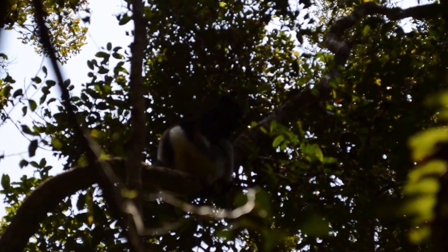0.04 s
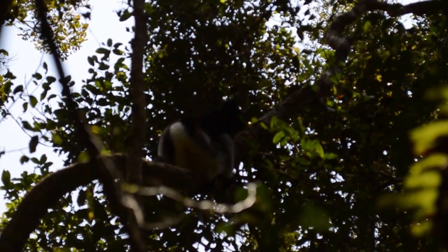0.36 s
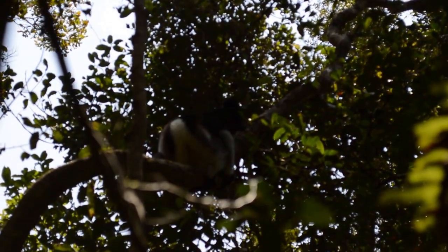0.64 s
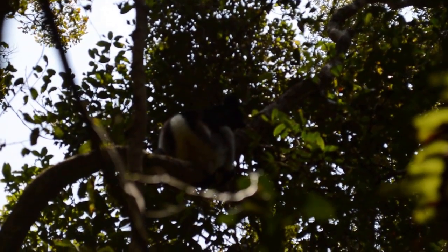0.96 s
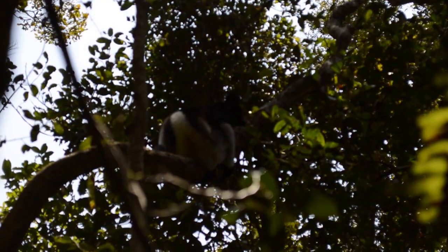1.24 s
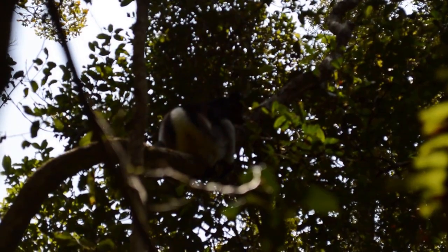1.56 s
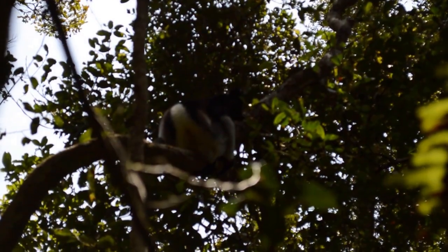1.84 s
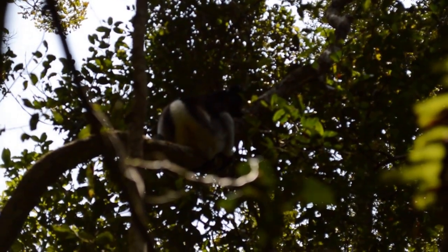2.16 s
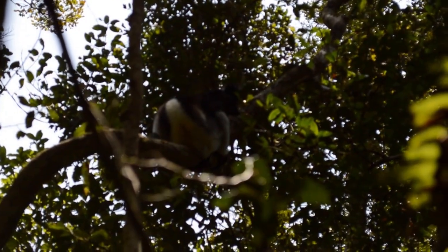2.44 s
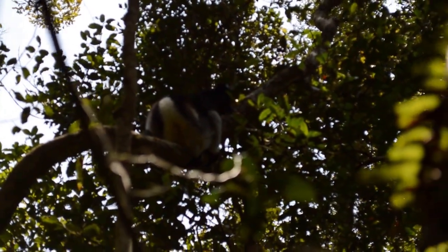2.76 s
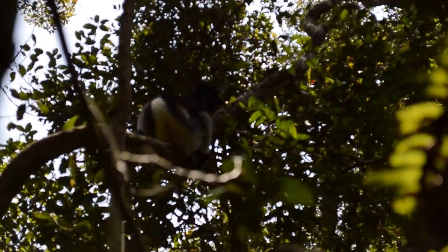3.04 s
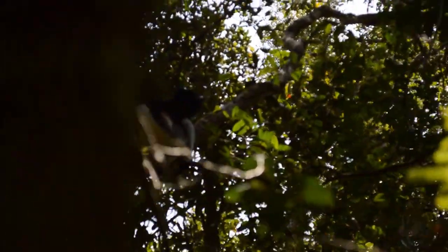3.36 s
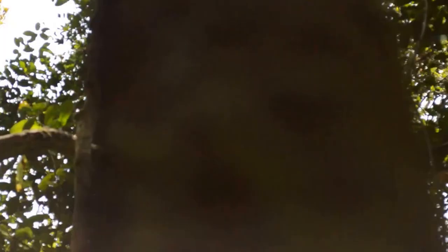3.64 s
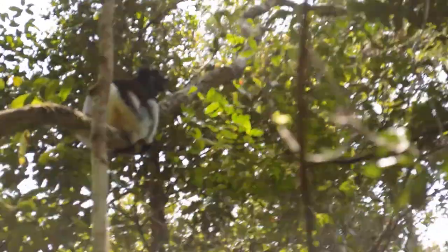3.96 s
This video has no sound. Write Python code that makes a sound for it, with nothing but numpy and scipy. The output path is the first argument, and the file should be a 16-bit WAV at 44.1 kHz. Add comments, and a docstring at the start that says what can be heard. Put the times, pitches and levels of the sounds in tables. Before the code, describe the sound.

A lemur's wailing call, heard on one microphone among trees. After a fading echo and a quiet stretch of twig ticks and hiss, the wail rises over rustling leaves and jumps to a loud, brassy, distorted note.

```python
"""An indri singing in a rainforest, on one microphone among the trees. The echo of a wail dies away over
soft hiss, low rumble and a faint hum. Twigs tick, a far insect swells three times, a distant whistle falls.
At 2.4 s a new wail starts, sags and climbs as the mouth opens, while leaves rustle. It roughens and at
3.7 s breaks into a much louder high note that overloads the recorder and pulls its gain down."""
import sys
import numpy as np
from scipy import signal
from scipy.fft import rfft, irfft
from scipy.io import wavfile
from scipy.ndimage import uniform_filter1d

SR = 44100
rng = np.random.default_rng(int(sys.argv[2]) if len(sys.argv) > 2 else 0)


def wav_out(sig):
    """Save sig, one row per channel (or a flat mono array), as 16-bit PCM at SR to the path in sys.argv[1]."""
    wavfile.write(sys.argv[1], SR, np.round(np.clip(np.atleast_2d(sig).T, -1, 1) * 32767).astype(np.int16))


N = 176400
LEAD = SR  # one unheard second in which the forest starts ringing
T = np.arange(-LEAD, N) / SR


def from_db(db):
    """Decibels to gain."""
    return 10 ** (np.asarray(db) / 20)


def rms_one(x):
    """Scale to unit power."""
    return x / np.sqrt(np.mean(x ** 2) + 1e-20)


def in_time(rows):
    """Each column of a table as a curve in time."""
    s, *columns = np.transpose(rows)
    return [np.interp(T, s, c) for c in columns]


def at_hz(rows, hz, column=1):
    """Read a table on a log-frequency axis."""
    rows = np.array(rows)
    return np.interp(np.log(hz + 1e-9), np.log(rows[:, 0]), rows[:, column])


def drift(corner_hz):
    """Random wander of unit power, mostly slower than the corner."""
    r = np.exp(-2 * np.pi * corner_hz / SR)
    return rms_one(signal.lfilter([1], [1, -2 * r, r * r], rng.standard_normal(len(T))))


def gate(start, end, attack_s=0.013, release_s=0.071):
    """Smooth attack, hold and release of a note."""
    opening = np.clip((T - start) / attack_s, 0, 1) * np.clip((end - T) / release_s, 0, 1)
    return np.sin(np.pi / 2 * opening) ** 2


def noise(colour):
    """Noise of a given spectral shape and unit power."""
    hz = np.arange(len(T) // 2 + 1) * SR / len(T)
    spectrum = rfft(rng.standard_normal(len(T))) * from_db(at_hz(colour, hz))
    return rms_one(irfft(spectrum, len(T)))


def voice(pitch, partial_db, jitter, rasp_db, count):
    """Harmonics of slightly unsteady vocal folds; rasp is fast phase noise that grows up the series."""
    shimmer_db, spread_rad = 2.87, 0.04
    unsteady_pitch = pitch * (1 + jitter * drift(53.4))
    phase = 2 * np.pi * np.cumsum(unsteady_pitch) / SR + from_db(rasp_db) * drift(400)
    tone = 0
    for k in range(1, count + 1):
        gain = from_db(partial_db(k) + shimmer_db * (k > 1) * drift(8)) * (k * pitch < SR / 2)
        tone -= gain * np.cos(k * phase + spread_rad * k * k)
    return np.sqrt(2) * tone


def earlier_wail():
    """A held note ending in an upward flick, sung in the lead-in so that only its echo is heard."""
    # course of the note (time [s], pitch [Hz], level [dB])
    course = [(-1.1, 705, -15.5), (-0.396, 706, -10.5), (-.2, 709, -16.5), (-.13, 745, -18.5),
              (-.07, 820, -17), (-0.0067, 890, -22)]
    # throat colour (frequency [Hz], gain [dB])
    colour = [(750, -7), (1420, -5.5), (1750, -5), (2120, -9), (2600, -9), (2850, -23.5), (3400, -14),
              (3700, -34), (4200, -23.5), (4700, -36), (5100, -25.5), (6200, -23), (7500, -30.5),
              (10000, -42), (14000, -62)]
    pitch, level = in_time(course)
    tone = voice(pitch, lambda k: level + at_hz(colour, k * pitch), jitter=0.0017, rasp_db=-40, count=14)
    return tone * gate(course[0][0], course[-1][0])


def forest(x):
    """Direct sound, quick scatter off near trunks, a tail shorter in the treble and a faint far ring."""
    # ring of the forest (frequency [Hz], t60 of the middle tail [s], gain of all echoes [dB])
    ring = [(300, 0.69, -4), (700, 1.05, -9), (1400, 1.04, -12), (2130, 1.17, -6.5), (4000, 0.9, -3),
            (6500, 0.88, -3.5), (12000, 0.57, -6)]
    first_echo_s, far_top_hz = 0.006, 2000
    t = np.arange(2 * SR) / SR
    edges = np.geomspace(250, 16000, 13)
    white, response = rng.standard_normal((2, len(t))), 0

    def tail_power(t60_s, db):
        return (from_db(db) * rms_one(from_db(-60 * t / t60_s) * (t > first_echo_s))) ** 2
    for k, (low, high) in enumerate(zip(edges, edges[1:])):
        hz = np.sqrt(low * high)
        near = tail_power(t60_s=0.37, db=0.5)
        middle = tail_power(at_hz(ring, hz), db=0)
        far = tail_power(t60_s=2.82, db=-10.5) * (hz < far_top_hz)
        band = signal.sosfilt(signal.butter(2, [low, high], "band", fs=SR, output="sos"), white[k % 2])
        response += band * np.sqrt((near + middle + far) / len(t)) * from_db(at_hz(ring, hz, column=2))
    return x + signal.fftconvolve(x, response)[:len(x)]


def ambience():
    """The steady bed of the place: forest hiss, low rumble of the air and a faint hum."""
    # hiss spectrum (frequency [Hz], relative density [dB])
    hiss = [(82, -36), (140, -5.5), (243, -3.5), (414, -5), (534, -5.5), (762, -5.5), (965, -6.5),
            (1640, -9), (4660, -14), (15500, -19)]
    # rumble spectrum (frequency [Hz], relative density [dB])
    rumble = [(20, -12), (40, -6), (70, -3), (130, -1), (170, -7), (400, -48)]
    # hum partials (frequency [Hz], level [dB])
    partials = [(59.8, -65), (119.6, -70.5), (179.4, -81)]
    hum = sum(from_db(db) * np.sin(2 * np.pi * (hz * T + rng.random())) for hz, db in partials)
    return from_db(-55.5) * noise(hiss) + from_db(-71) * noise(rumble) + np.sqrt(2) * hum


def ticks(t60_s=0.04):
    """Short bright snaps of leaves and twigs."""
    # snaps in the foliage (time [s], level [dB])
    snaps = [(.165, -56), (.228, -56), (0.454, -54), (1.258, -59)]
    # their spectrum (frequency [Hz], relative density [dB])
    colour = [(1000, -14), (4000, -5), (9000, 0), (12000, 0), (16000, -14)]
    return noise(colour) * sum(from_db(db - 60 * np.abs(T - s) / t60_s) * (T >= s) for s, db in snaps)


def shrill(pitch, width_hz):
    """A high tone that distance has blurred into a narrow band."""
    phase = 2 * np.pi * np.cumsum(pitch) / SR
    return rms_one(drift(width_hz / 2) * np.cos(phase) + drift(width_hz / 2) * np.sin(phase))


def far_insect(pitch_hz=6950, rise_hz_per_s=330):
    """Slowly rising shrilling, far from the microphone."""
    # three swells (time [s], level [dB])
    swells = [(.35, -78), (.6, -67), (.73, -71), (.87, -61.5), (1.02, -68), (1.13, -60.5), (1.3, -68),
              (1.55, -81)]
    level, = in_time(swells)
    return from_db(level) * shrill(pitch_hz + rise_hz_per_s * (T - 1), width_hz=420)


def far_whistle():
    """One faint falling note in the distance, probably a bird."""
    # course of the note (time [s], pitch [Hz], level [dB])
    course = [(1.35, 5300, -75), (1.52, 4950, -73), (1.68, 4680, -71), (1.85, 4580, -76), (2.05, 4550, -88)]
    pitch, level = in_time(course)
    return from_db(level) * shrill(pitch, width_hz=300)


def wail(start_s=2.363, end_s=3.705):
    """The indri's long low note; its upper resonances shift as the mouth opens."""
    # sag and climb (time [s], pitch [Hz])
    melody = [(2.36, 618.5), (2.478, 599), (2.58, 583.5), (2.716, 582.9), (2.86, 586.8), (2.98, 591.3),
              (3.266, 612.7), (3.52, 638.7), (3.6, 668.8), (3.64, 727), (3.67, 808)]
    # the three lowest partials, each (time [s], level [dB])
    first = [(2.375, -30.5), (2.437, -29.5), (2.463, -47), (2.495, -23.5), (2.527, -28), (2.547, -35),
             (2.583, -19.5), (2.857, -20), (2.895, -24.5), (2.945, -43), (3.017, -21), (3.087, -20.5),
             (3.161, -33), (3.265, -20.5), (3.367, -34), (3.389, -23), (3.457, -16.5), (3.517, -26.5),
             (3.541, -24), (3.65, -18.5)]
    second = [(2.375, -29), (2.499, -28), (2.531, -42), (2.583, -26), (2.857, -26), (2.881, -37.5),
              (3.023, -20.5), (3.097, -19.5), (3.119, -33), (3.155, -19), (3.183, -32), (3.201, -24),
              (3.321, -17.5), (3.393, -29), (3.531, -16), (3.545, -22.5), (3.599, -19), (3.65, -23.5)]
    third = [(2.375, -40), (2.667, -41.5), (2.765, -57), (2.843, -30), (3.123, -39), (3.159, -24.5),
             (3.201, -38.5), (3.285, -22), (3.519, -27.5), (3.64, -18.5)]
    # swell of the partials above them (time [s], relative level [dB])
    treble = [(2.375, -54), (2.381, -35), (2.437, -32.5), (3.037, -28.5), (3.045, -25.5), (3.141, -25),
              (3.159, -27.5), (3.435, -25.5), (3.457, -21.5), (3.65, -25.5)]
    # their throat colour (frequency [Hz], gain with mouth narrow [dB], gain with mouth wide [dB])
    throat = [(2500, -13, -15.5), (3035, -8.5, -3.5), (3740, -24, -26.5), (4230, -14.5, -7.5),
              (4850, -11.5, -7.5), (5324, -1, -4.5), (5720, -15, -7.5), (6290, -7, -13.5),
              (7280, -30, -20.5), (8000, -25, -26), (9740, -26, -22), (9810, -30, -33), (10730, -54, -37),
              (13000, -54, -53), (15500, -66, -68)]
    # roughness just before the break (time [s], rasp [dB re 1 rad], jitter [share of pitch])
    roughness = [(3.52, -49.5, 0.0023), (3.6, -48, 0.011), (3.66, -27, 0.0224)]
    mouth_opens_s, mouth_wide_s, brighten_s = 2.72, 3.1, 0.023
    pitch, = in_time(melody)
    rasp_db, jitter = in_time(roughness)
    lows_db = [in_time(curve)[0] for curve in (first, second, third)]
    treble_db = in_time(treble)[0] - 1.5
    dull_db_per_octave = 10 * np.exp(-np.maximum(T - start_s, 0) / brighten_s)
    mouth = np.clip((T - mouth_opens_s) / (mouth_wide_s - mouth_opens_s), 0, 1)

    def partial_db(k):
        if k <= len(lows_db):
            return lows_db[k - 1]
        dull_db = dull_db_per_octave * max(np.log2(k / 4.7), 0)  # the top opens just after the onset
        narrow_db, wide_db = at_hz(throat, k * pitch), at_hz(throat, k * pitch, column=2)
        return treble_db - dull_db + (1 - mouth) * narrow_db + mouth * wide_db
    return voice(pitch, partial_db, jitter, rasp_db, count=22) * gate(start_s, end_s)


def rustle():
    """Leaves stir softly under the wail."""
    # swell of the leaves (time [s], level [dB])
    swell = [(2.55, -81), (2.76, -55), (2.82, -50), (2.855, -44.5), (2.89, -50), (3.08, -48), (3.3, -59.5),
             (3.7, -56)]
    # their spectrum (frequency [Hz], relative density [dB])
    colour = [(60, -20), (170, 0.5), (300, 3.5), (900, 4.5), (1600, 1), (4000, -22.5)]
    return from_db(in_time(swell)[0]) * noise(colour)


def high_note(start_s=3.659):
    """The voice breaks upward into a nearly pure note that turns brassy."""
    # course of the note (time [s], pitch [Hz], fundamental level [dB], overtone level [dB])
    course = [(3.66, 1202, -5.5, -12), (3.7, 1232, 0, -9), (3.75, 1253, -0.5, 2), (3.8, 1274, 3, -1.5),
              (3.86, 1288, -4, 1), (3.92, 1288, -6, 4), (4.0, 1296, 3, 4)]
    # throat colour (frequency [Hz], gain [dB])
    colour = [(1250, 0.5), (2550, -4.5), (3850, -12), (5100, -15), (6450, -26), (7700, -29), (9000, -20.5),
              (10300, -25.5), (11600, -28.5), (12900, -37), (14200, -61), (15500, -70)]
    pitch, fundamental_db, overtone_db = in_time(course)

    def partial_db(k):
        return (fundamental_db if k == 1 else overtone_db) + at_hz(colour, k * pitch)
    return voice(pitch, partial_db, jitter=0.00055, rasp_db=-40, count=12) * gate(start_s, np.inf)


def scene():
    """What reaches the microphone: the indri through the trees, over the small sounds of the forest."""
    indri = forest(earlier_wail() + wail() + high_note())
    return (indri + far_insect() + far_whistle() + ticks() + ambience() + rustle())[None, LEAD:]


def record(dry):
    """The recorder's gain sinks slowly, drops on loud notes and stays down; what gets past it clips."""
    threshold_db, attack_s, sink_db_per_s = -14, 0.11, 0.5
    clip_level, low_cut_hz, top_cut_hz = 0.98, 47, 15800
    level_db = 10 * np.log10(np.maximum(uniform_filter1d(dry[0] ** 2, size=256), 1e-12))
    excess_db = np.maximum(level_db - threshold_db, 0)
    sink_db = sink_db_per_s * T[LEAD:]
    reduction_db = np.maximum.accumulate(excess_db - sink_db) + sink_db
    r = np.exp(-1 / (attack_s * SR))
    gain = from_db(-signal.lfilter([1 - r], [1, -r], reduction_db))
    clipped = np.clip(dry * gain, -clip_level, clip_level)
    low_cut = signal.butter(1, low_cut_hz, "high", fs=SR, output="sos")
    top_cut = signal.ellip(10, .1, 70, top_cut_hz, fs=SR, output="sos")
    return signal.sosfilt(top_cut, signal.sosfilt(low_cut, clipped))


dry = scene()
out = record(dry)
wav_out(out)
```